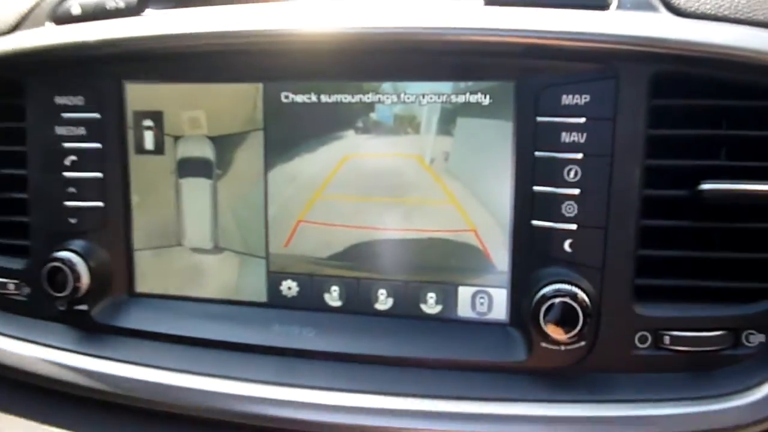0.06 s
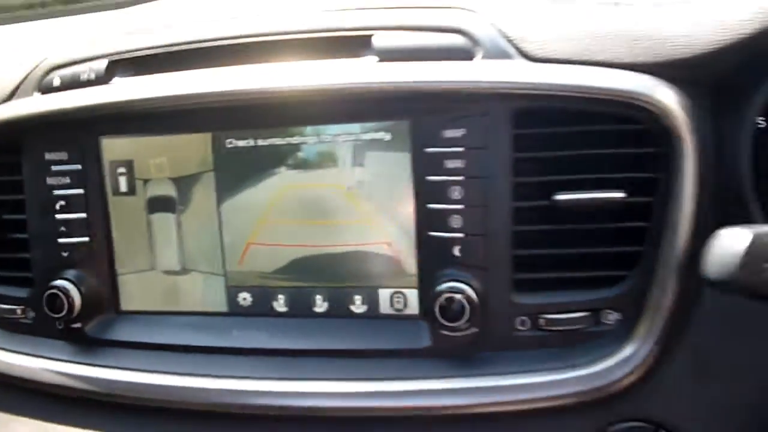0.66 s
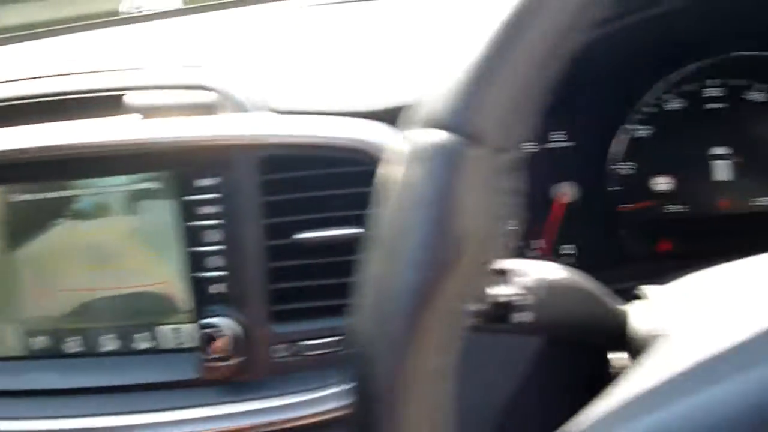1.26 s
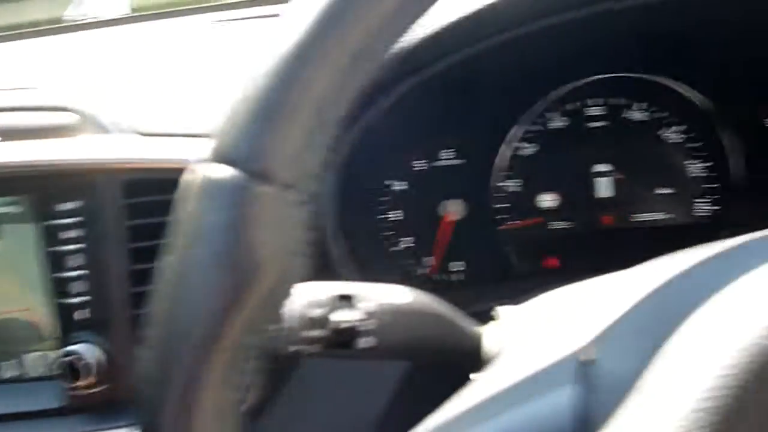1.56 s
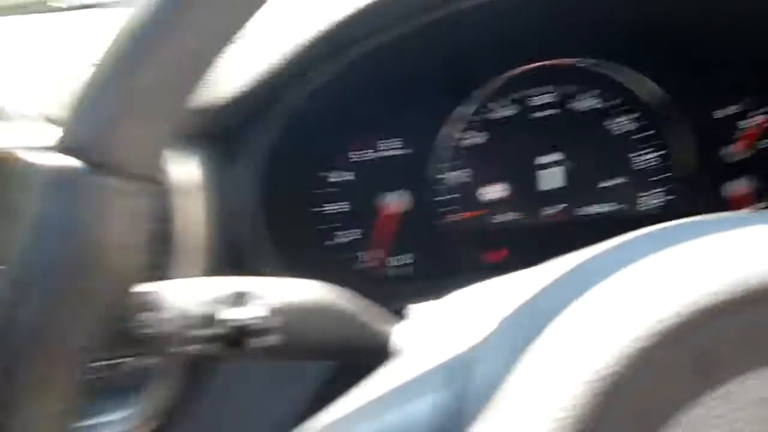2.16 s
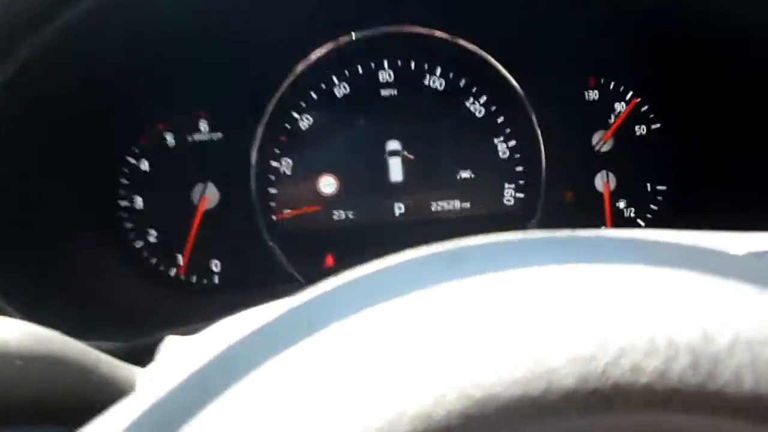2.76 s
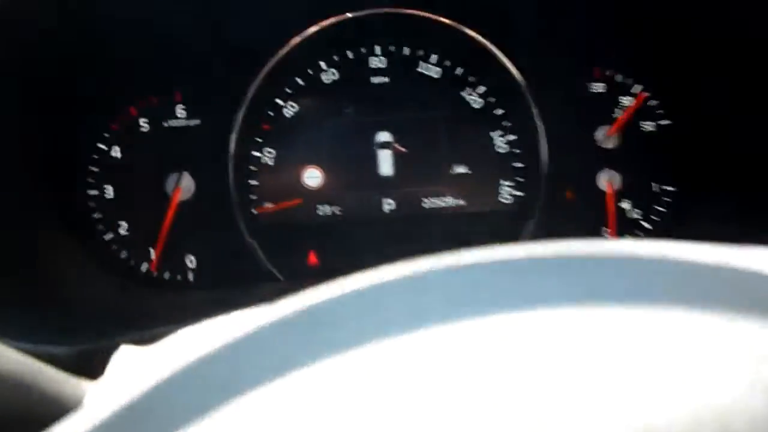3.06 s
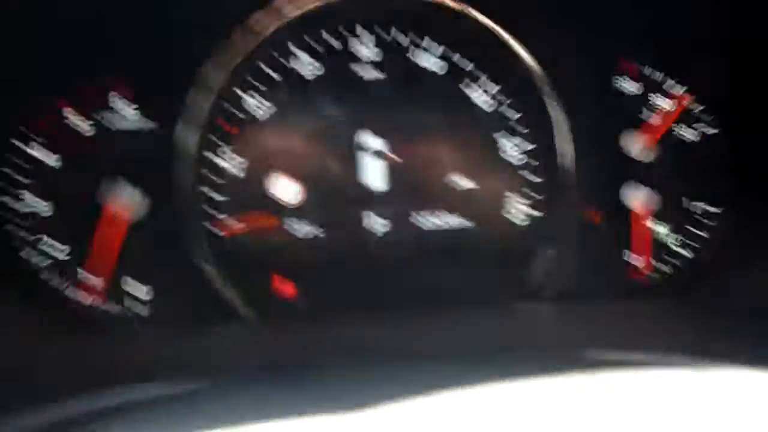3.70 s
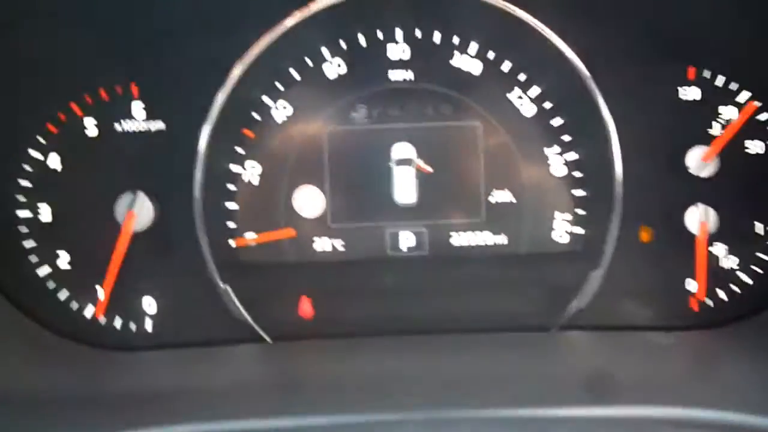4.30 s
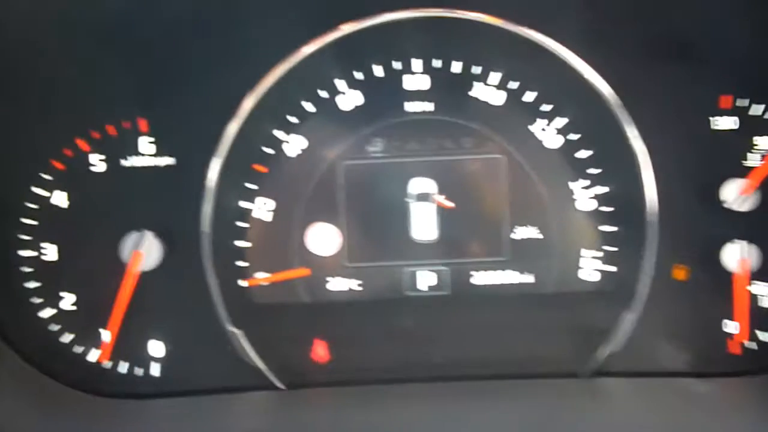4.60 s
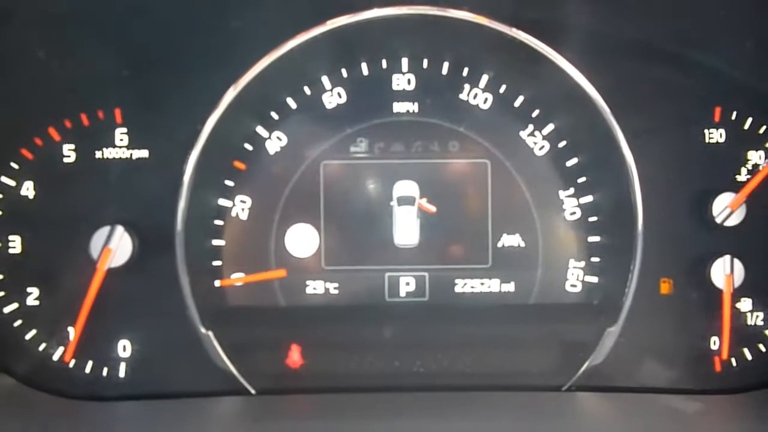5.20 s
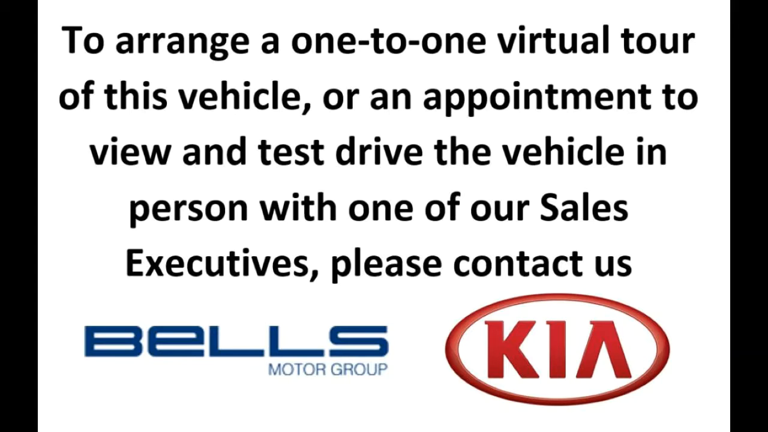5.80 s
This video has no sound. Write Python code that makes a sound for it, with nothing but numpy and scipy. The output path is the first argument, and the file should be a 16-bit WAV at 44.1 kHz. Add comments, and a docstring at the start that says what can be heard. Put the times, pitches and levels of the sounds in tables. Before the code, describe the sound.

Air blows and hisses through a car's dashboard vents while the engine idles, broken by handling clicks and two panel knocks.

```python
"""The steady rush of a ventilation fan fills a parked car, with a four-cylinder engine idling below it.
Swirling air rushes in the ducts, hisses through the vent slats and makes the cabin ring. Its hollow
note shifts as a hand-held camera moves from the centre vents to the dials. Fingers click on the
camera's case and a panel is knocked twice. The loudest of these make the camera turn its level down
for a moment, and the sound cuts out once, briefly."""
import sys
import numpy as np
from scipy import signal
from scipy.fft import rfft, irfft, next_fast_len
from scipy.io import wavfile
from scipy.ndimage import minimum_filter1d, map_coordinates

SR = 44100
rng = np.random.default_rng(int(sys.argv[2]) if len(sys.argv) > 2 else 0)


def master_out(mix):
    """Clip the mix to full scale and print it as 16-bit PCM to the path in sys.argv[1]."""
    frames = np.transpose(np.atleast_2d(mix))
    ceiling = np.clip(frames, -1, 1)
    pcm = np.round(ceiling * 32767).astype(np.int16)
    wavfile.write(sys.argv[1], SR, pcm)


N = 257984


def amp(db):
    """Turn decibels (dB) into a number to multiply by."""
    return 10 ** (np.asarray(db) / 20)


def unit(x):
    """Scale x to an average (rms) level of 1."""
    return x / np.sqrt(np.mean(x ** 2) + 1e-20)


def clock():
    """The time of each sample, in seconds."""
    return np.arange(N) / SR


def curves(rows):
    """Join timed rows with straight lines: one curve for each column after the time."""
    times, *columns = np.transpose(rows)
    return [np.interp(clock(), times, column) for column in columns]


def wobble(rate):
    """A smooth curve through `rate` random points a second."""
    points = rng.standard_normal(int(N * rate / SR) + 4)
    return map_coordinates(points, [clock() * rate])


def filtered(x, response):
    """Turn each frequency in x up or down by response(hz)."""
    size = next_fast_len(N + SR // 2)
    return irfft(rfft(x, size) * response(np.fft.rfftfreq(size, 1 / SR)), size)[:N]


def noise(spectrum):
    """Noise of level 1, shaped by rows of frequency in Hz and level in dB."""
    row_hz, db = np.transpose(spectrum)
    shape = lambda hz: amp(np.interp(np.log(hz + 1), np.log(row_hz), db))
    return unit(filtered(rng.standard_normal(N), shape))


def resonance(centre_hz, width_hz):
    """A breathy note of level 1, kept ringing by swirling air; narrower sounds purer."""
    phase = 2 * np.pi * np.cumsum(centre_hz * np.ones(N)) / SR
    keep_slow = lambda hz: 1 / (1 + (hz / width_hz) ** 2)
    swirl_a, swirl_b = [filtered(rng.standard_normal(N), keep_slow) for _ in range(2)]
    return unit(swirl_a * np.cos(phase) + swirl_b * np.sin(phase))


def place(sound, start_s):
    """Put a short sound into the scene at start_s."""
    return np.pad(sound, (round(start_s * SR), N))[:N]


def strike(start_s, tones, bright_db, pivot_hz=4000):
    """A struck object rings with fading tones; `bright_db` makes the ring brighter or duller."""
    t = np.arange(SR // 5) / SR
    ring = 0
    for k, (hz, db, fade_s) in enumerate(tones):
        level = amp(db + bright_db * np.log2(hz / pivot_hz) - 60 * t / fade_s)
        ring += level * np.sin(2 * np.pi * hz * t) * (-1) ** k
    return place(ring, start_s)


# The engine's boom along the camera's path. Each row: time in seconds, level in dB.
ENGINE_BOOM = [(0, -33.5), (2.15, -32.5), (2.6, -43), (3.4, -37.5), (4.1, -47), (4.9, -40.5), (5.6, -37)]

def engine(firing_hz=27.15, firing_db=-39.5, hum_hz=51.7, hum_db=-43, drift=0.0025):
    """The engine fires twice a turn at about 800 turns a minute, and booms an octave higher."""
    phase = 2 * np.pi * np.cumsum(firing_hz * (1 + drift * wobble(3.0))) / SR
    firing = amp(firing_db + 0.6 * wobble(5.4)) * np.sin(phase)
    boom_db, = curves(ENGINE_BOOM)
    boom = amp(boom_db) * np.sin(2 * phase)
    # A hum close in pitch, perhaps the fan's shaft, throbs against the boom.
    hum = amp(hum_db) * np.sin(2 * np.pi * hum_hz * clock())
    return np.sqrt(2) * (firing + boom + hum)


def scuff(start_s, db, fade_s=0.038, band_hz=(2400, 5000)):
    """A finger rubs the case with a short, rough noise."""
    t = np.arange(SR // 10) / SR
    band = signal.butter(2, band_hz, "bandpass", fs=SR, output="sos")
    rub = unit(signal.sosfilt(band, rng.standard_normal(len(t))))
    return place(amp(db - 60 * t / fade_s) * rub, start_s)


# The tones of the plastic case. Each row: pitch in Hz, level in dB, seconds to fade by 60 dB.
CASE_TONES = [(625, -12, 0.018), (1153, -7.5, 0.0072), (1970, -4, 0.0047), (2530, -4.5, 0.013),
              (3950, -1.5, 0.0069), (4970, -4.5, 0.0066), (5860, -5.5, 0.008), (6360, -0.5, 0.0045),
              (10970, 0, 0.0064)]
# Touches on the case. Each row: start in seconds, level in dB, brightness in dB per octave,
# scuff level in dB relative to the touch, dB lost at each bounce.
CASE_TOUCHES = [(1.6794, -26.5, -4.5, -3.5, 3.5), (1.6833, -13.5, -4, -1, 5), (1.6933, -27, -1, -6.5, 2.5),
                (3.5228, -25.5, -2.5, -6.5, 16.5), (3.5645, -28.5, 0.5, -8.5, 11.5),
                (3.6277, -23.5, -5, -5.5, 13), (4.2089, -4.5, 3, -18, 14)]

def case_clicks(hits=4, bounce_s=0.0017):
    """Each touch scuffs the camera's case and bounces on it, weaker every time."""
    clicks = np.zeros(N)
    for start_s, db, bright_db, scuff_db, loss_db in CASE_TOUCHES:
        clicks += scuff(start_s, db + scuff_db)
        for k in range(hits):
            clicks += amp(db - loss_db * k) * strike(start_s + k * bounce_s, CASE_TONES, bright_db)
    return clicks


# The tones of the panel. Each row: pitch in Hz, level in dB, seconds to fade by 60 dB.
PANEL_TONES = [(790, -14.5, 0.03), (1101, 1.5, 0.033), (1078, -13.5, 0.16), (1610, -27.5, 0.15),
               (1818, -14.5, 0.14), (2000, -12, 0.016), (2940, -25, 0.013), (5670, -27.5, 0.032)]
# Knocks on it. Each row: start in seconds, level in dB, brightness in dB per octave.
PANEL_KNOCKS = [(3.7562, -1.5, 0.5), (4.4399, -7.5, 3)]

def panel_knocks():
    """Two knocks set a panel ringing."""
    return sum(amp(db) * strike(start_s, PANEL_TONES, bright_db)
               for start_s, db, bright_db in PANEL_KNOCKS)


# Notes of the cabin and ducts. Each row: pitch in Hz, width in Hz, top level in dB,
# time of that top in seconds, seconds from there to half strength.
CABIN_NOTES = [(206.5, 20, -31, 5.2, 4.1), (265.3, 30, -32.5, 2.7, 1.2), (257, 17, -33.5, 5.2, 0.8),
               (319.3, 29, -32.5, 3.0, 1.0), (406.5, 32, -35, 3.8, 3.4), (557.3, 35, -33, 0.6, 1.4),
               (737, 18, -31, 3.45, 0.11), (835, 26, -30, 2.7, 0.17), (925, 22, -40, 5.9, 1.4),
               (1099, 44, -39, 2.7, 4), (1416, 39, -38, 2.8, 0.38), (1626, 41, -45, 5.8, 3),
               (3183, 67, -47, 1.3, 1.6), (3640, 190, -46.5, 6, 4.3)]

def cabin_ring():
    """Air rings the cabin and ducts; each note swells as the camera passes its loudest spot."""
    ring = np.zeros(N)
    for hz, width_hz, db, passing_s, span_s in CABIN_NOTES:
        nearness = 1 / (1 + ((clock() - passing_s) / span_s) ** 2)
        ring += amp(db) * nearness * resonance(hz, width_hz)
    return ring


# The tone colour of the hiss. Each row: frequency in Hz, relative level in dB.
HISS_COLOUR = [(600, -30), (1600, -4), (2400, -1), (3300, 0.5), (4100, -2.5), (4800, -5.5), (5700, -9),
               (6800, -12), (7400, -19.5), (8000, -20)]

def slat_hiss(vents_db=-37, dials_db=-39, swing_s=2.86, ease_s=0.47, flutter_db=0.8):
    """Air hisses through the vent slats, a little softer once the camera swings to the dials."""
    swing = (1 + np.tanh((clock() - swing_s) / (2 * ease_s))) / 2  # 0 at the vents, 1 at the dials
    level_db = vents_db + (dials_db - vents_db) * swing
    return amp(level_db + flutter_db * wobble(23)) * noise(HISS_COLOUR)


# The note at the vents. Each row: time in seconds, pitch in Hz, level in dB.
VENT_NOTE_PATH = [(0, 905.6, -43), (0.8, 909, -36.5), (1.35, 906, -31), (2.05, 871, -30.5),
                  (2.45, 835, -37.5), (2.9, 822, -54)]

def vent_note(width_hz=38):
    """The air stream sounds a hollow note that sinks and fades as the camera leaves the vents."""
    hz, db = curves(VENT_NOTE_PATH)
    return amp(db) * resonance(hz, width_hz)


# The note at the dials. Each row: time in seconds, level in dB.
DIAL_NOTE_LEVELS = [(0, -39.5), (2.2, -40.5), (2.45, -31), (2.7, -24), (3.05, -29), (3.4, -24),
                    (3.7, -26.5), (4.15, -26), (4.5, -29), (5.7, -30.5)]

def dial_note(hz=784, width_hz=30):
    """In front of the dials the air sounds a lower hollow note that holds its pitch."""
    db, = curves(DIAL_NOTE_LEVELS)
    return amp(db) * resonance(hz, width_hz)


# The tone colour of the rushing air. Each row: frequency in Hz, relative level in dB.
RUSH_COLOUR = [(20, -19.5), (40, -21), (85, -7), (145, -4.5), (200, 0), (235, -0.5), (290, -1.5), (480, -5),
               (620, -7), (700, -9.5), (780, -10), (880, -5.5), (1100, -12), (1400, -14.5), (2100, -24),
               (4000, -51)]

def duct_rush(db=-22.5, flutter_db=1.0):
    """Air swirls through the ducts, and its rush fills the cabin evenly."""
    return amp(db + flutter_db * wobble(14)) * noise(RUSH_COLOUR)


def scene():
    """Engine, fan, clicks and knocks add up at one microphone."""
    idle = engine()
    fan = duct_rush() + slat_hiss() + cabin_ring() + vent_note() + dial_note()
    return (idle + fan + case_clicks() + panel_knocks())[None]


def limiter(x, ceiling_db=-5, hold_s=0.07, release_s=0.49):
    """A peak above the ceiling turns the level down at once; it holds, then eases back."""
    excess_db = np.maximum(20 * np.log10(np.abs(x) + 1e-9) - ceiling_db, 0)
    half = int(hold_s * SR / 2)
    held_db = -minimum_filter1d(-excess_db, 2 * half + 1, origin=half, mode="constant")  # recent peak
    fade = np.exp(-clock() / release_s)
    cut_db = fade * np.maximum.accumulate(held_db / fade)
    return x * amp(-cut_db)


# When the sound is on. Each row: start in seconds, end in seconds, fade-out in seconds.
SOUND_ON = [(-1, 3.787, .002), (3.927, 5.748, .025)]

def record(dry, hiss_db=-49, notch_hz=4390, notch_width_hz=60, top_hz=8100):
    """The camera tames peaks, adds faint hiss, cuts out briefly, and loses a thin band and the highs."""
    t = clock()
    on = sum((t >= start) * np.clip((end - t) / fade, 0, 1) for start, end, fade in SOUND_ON)
    notch = lambda hz: np.abs(hz - notch_hz) / np.hypot(hz - notch_hz, notch_width_hz)
    treble_cut = lambda hz: np.clip((top_hz - hz) / 900, 0, 1)
    sound = limiter(dry[0]) + amp(hiss_db) * rng.standard_normal(N)
    return filtered(sound * on, lambda hz: notch(hz) * treble_cut(hz))[None]


dry = scene()
out = record(dry)
master_out(out)
```